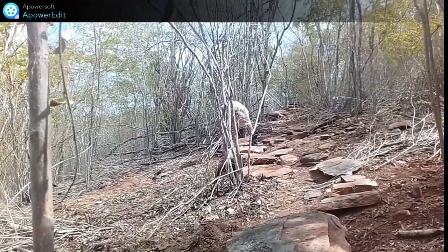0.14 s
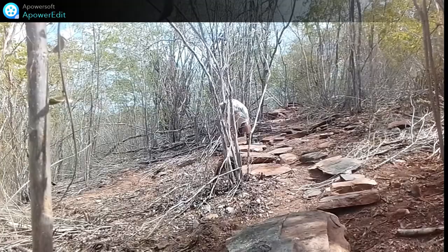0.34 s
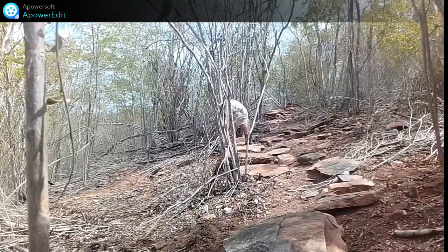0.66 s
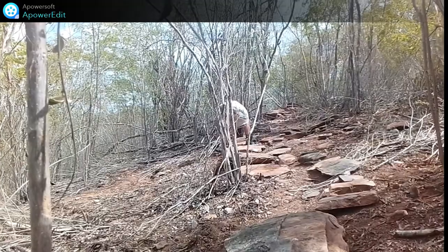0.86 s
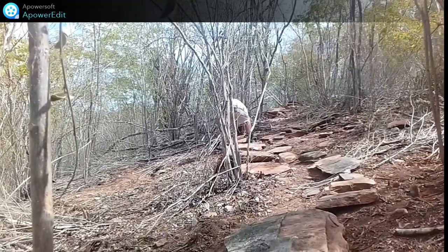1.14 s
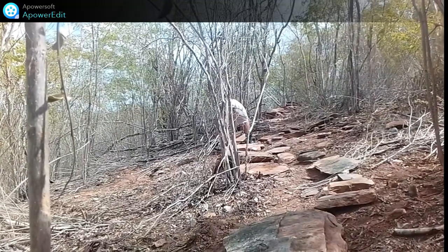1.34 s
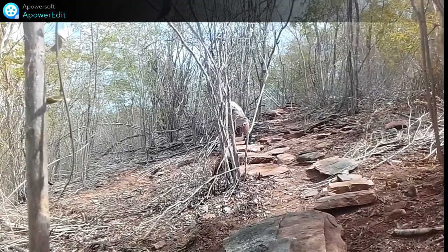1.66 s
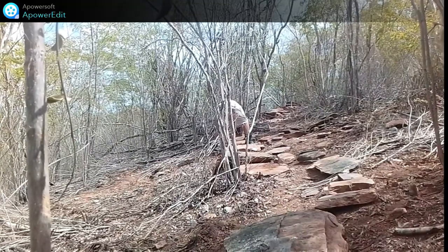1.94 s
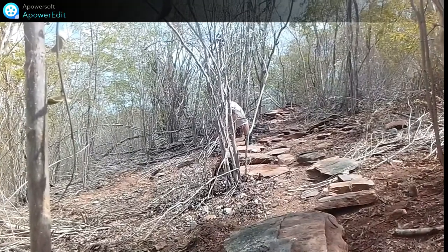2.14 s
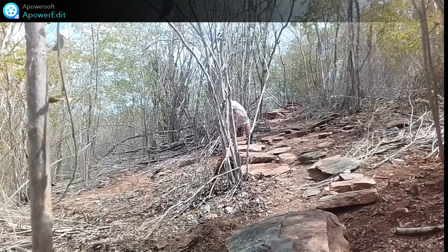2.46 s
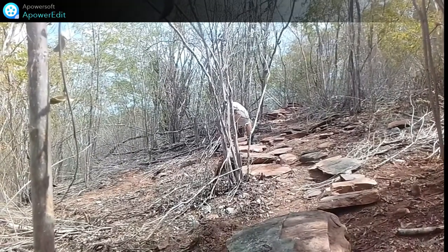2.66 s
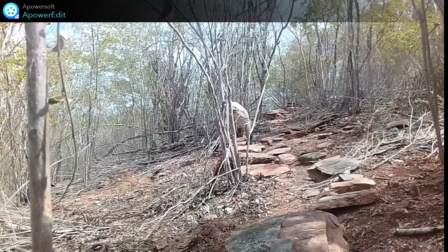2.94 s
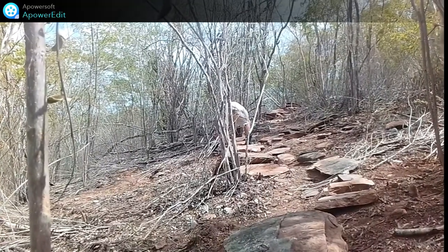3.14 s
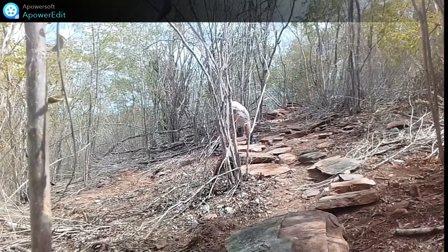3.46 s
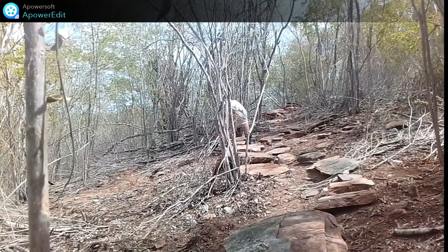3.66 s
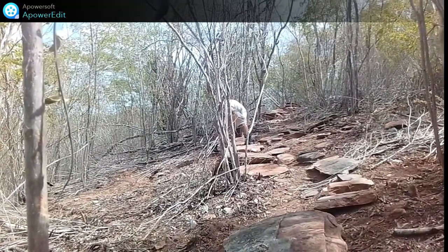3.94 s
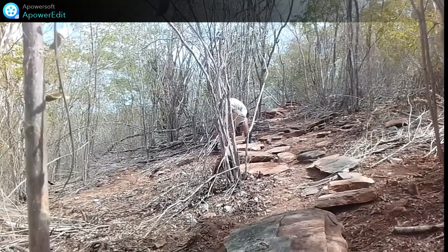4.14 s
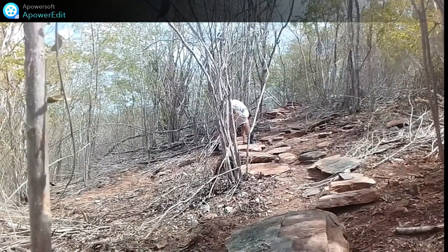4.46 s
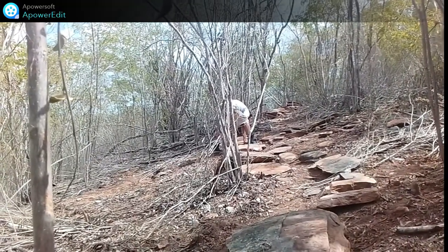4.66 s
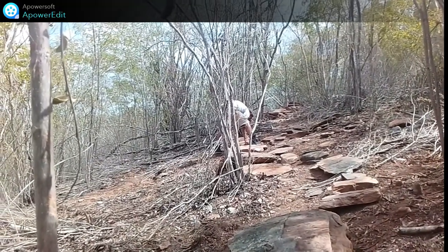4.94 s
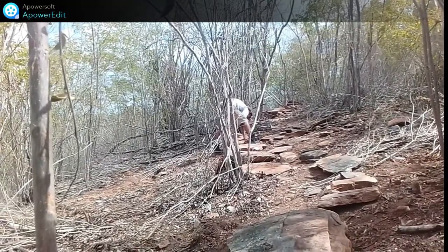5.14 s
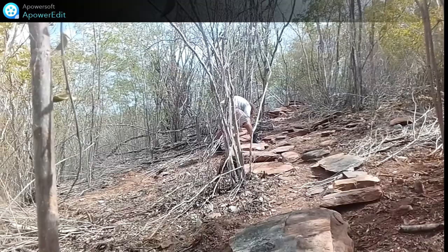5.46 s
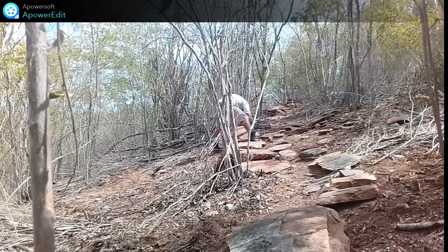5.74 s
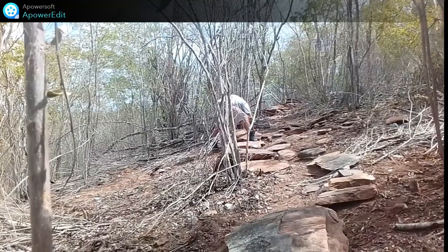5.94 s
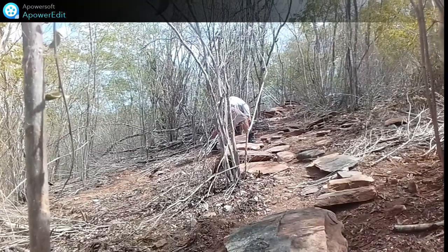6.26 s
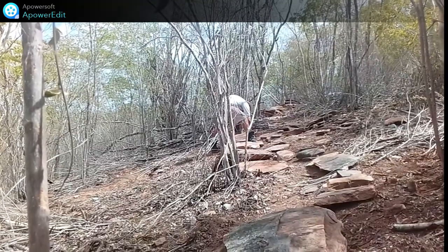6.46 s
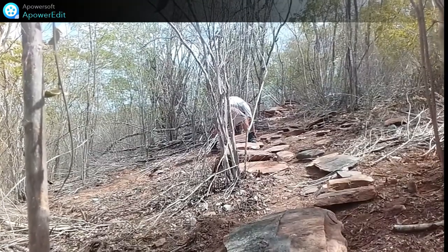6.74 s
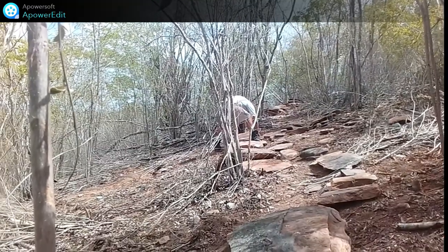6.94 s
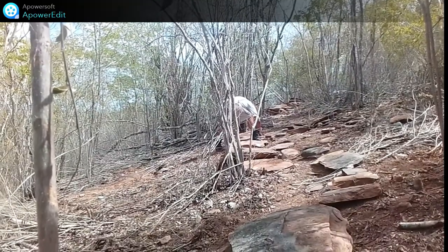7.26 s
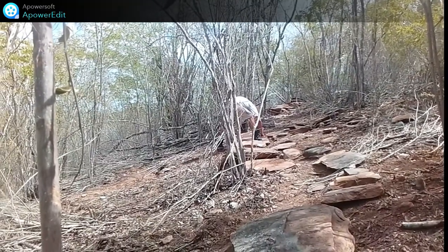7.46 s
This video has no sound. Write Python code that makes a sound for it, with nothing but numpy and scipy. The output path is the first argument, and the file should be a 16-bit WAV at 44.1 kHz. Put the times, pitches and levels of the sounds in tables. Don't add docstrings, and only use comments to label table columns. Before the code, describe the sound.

Some metres away on a dry wooded slope, stones are stacked by hand. Soft grit scrapes come first, then a very loud slab clack, two lighter clacks, a duller knock, brief brush crackles, a heavy tumbling double knock, and a final low grinding scrape. Trees return a short scattered echo. Light wind bumps the microphone over a constant faint hiss.

```python
import sys
import numpy as np
from scipy import signal
from scipy.fft import rfft, irfft, next_fast_len
from scipy.io import wavfile

SR = 44100
rng = np.random.default_rng(int(sys.argv[2]) if len(sys.argv) > 2 else 0)


def boost(x):
    u = np.asarray(x, float) / 20
    return 10 ** u


def master(y):
    cut = np.clip(np.atleast_2d(y).T, -1, 1)
    pcm = np.round(cut * 32767)
    wavfile.write(sys.argv[1], SR, pcm.astype(np.int16))


N = 335601


def rms_one(x):
    return x / np.sqrt(np.mean(x ** 2) + 1e-20)


def add(out, s, sound):
    i = int(s * SR)
    out[..., i:i + sound.shape[-1]] += sound[..., :N - i]


def filtered(x, order, edge_hz, kind):
    return signal.sosfilt(signal.butter(order, edge_hz, kind, fs=SR, output="sos"), x)


def shaped(spectrum):
    hz, level_db = np.transpose(spectrum)
    size = next_fast_len(N)
    f = np.maximum(np.fft.rfftfreq(size, 1 / SR), 1)
    gain = boost(np.interp(np.log(f), np.log(hz), level_db))
    return rms_one(irfft(rfft(rng.standard_normal(size)) * gain, size)[:N])


def swells(s, rise_s, fall_s, level_db):
    power, t = np.zeros(N), np.arange(-SR // 2, SR // 2) / SR
    for peak_s, rise, fall, peak_db in zip(s, rise_s, fall_s, level_db):
        shape = boost(2 * (peak_db - 20.5 * np.maximum(-t / rise, t / fall)))
        early = max(0, -int((peak_s + t[0]) * SR))
        add(power, max(0, peak_s + t[0]), shape[early:])
    return np.sqrt(power)


def grains(per_s, spread_db):
    excess = np.minimum(rng.exponential(1, N), 4)
    sizes = boost(spread_db * excess) * rng.choice([-1, 1], N)
    return sizes * (rng.random(N) < per_s / SR) + 1e-18


def ring(clicks, hz, t60):
    r, w = boost(-60 / (t60 * SR)), 2 * np.pi * hz / SR
    return signal.lfilter([0, np.sin(w)], [1, -2 * r * np.cos(w), r * r], clicks)


def burst(t, level_db, low_hz, high_hz, t60, rise_s):
    sources = [rng.standard_normal(len(t)), t == 0]
    noise, click = map(rms_one, filtered(sources, 2, [low_hz, high_hz], "band"))
    shape = boost(level_db - 60 * t / t60) * (1 - np.exp(-t / rise_s))
    return np.array([shape * noise, click * np.sqrt(np.mean(shape ** 2))])


def brief(t, t60):
    damping = 1.5
    return boost(-60 * damping * t / t60) * np.sqrt(1 + damping)


# hz [Hz], level_db [dB per Hz]
HISS_SPECTRUM = [(15, -61.5), (43, -23.5), (76, -3.5), (242, 1.5), (607, -4.5), (2300, -12), (14800, -18.5),
                 (16000, -22.5)]


def hiss():
    return boost(-57) * shaped(HISS_SPECTRUM)


# middle_s [s], peak_db [dB], pitch_hz [Hz]
WIND_PUFFS = [(1.62, -33, 64.85), (6.30, -35, 64.8), (3.675, -56, 69.4), (3.798, -44, 80), (3.925, -53, 70),
              (3.989, -50.5, 80), (4.125, -48.5, 68.2), (4.428, -45.5, 84.3), (4.455, -56, 69.8),
              (4.55, -57, 88.8), (4.575, -44, 90.5), (4.671, -47, 110), (4.696, -46.5, 125),
              (4.717, -46, 135.5), (4.744, -43, 80), (4.768, -45, 130), (4.788, -49, 75), (4.824, -54, 170),
              (4.833, -46, 75), (5.203, -42.5, 96), (5.214, -49, 96.3), (5.348, -36.5, 95.3),
              (5.37, -37.5, 141), (5.381, -45, 110), (6.43, -49, 70), (6.901, -59.5, 69.8), (7.53, -43, 75),
              (7.575, -60, 65)]
# start_s [s], spacing_s [s], peak_db [dB], pitch_hz [Hz]
WIND_FLUTTERS = [
    (3.371, 0.057, -58, 68),
]
# time_s [s], level_db [dB]
RUMBLE_LEVEL = [(0.0, -78), (1.35, -65), (1.7, -44.5), (1.99, -74), (3.77, -83), (5.93, -74), (6.27, -49),
                (6.61, -78), (7.61, -57)]


def wind():
    t = np.arange(-SR // 20, SR // 20) / SR
    flutter = [(s + k * spacing_s, peak_db, hz)
               for s, spacing_s, peak_db, hz in WIND_FLUTTERS for k in range(6)]
    puffs = np.zeros(N)
    for s, peak_db, hz in WIND_PUFFS + flutter:
        bell = boost(peak_db) * np.exp(-(t * hz / 0.36) ** 2)
        add(puffs, s + t[0], -bell * np.sin(2 * np.pi * hz * t + 0.7))
    rumble = rms_one(filtered(rng.standard_normal(N), 2, [35, 110], "band"))
    time_s, level_db = np.transpose(RUMBLE_LEVEL)
    rumble_db = np.interp(np.arange(N) / SR, time_s, level_db, -120, -120)
    return filtered(puffs, 3, 41, "high") + boost(rumble_db - 10.5) * rumble


# peak_s [s], rise_s [s], fall_s [s], level_db [dB]
WHISTLES = [
    (7.02, .02, 0.035, -62),
    (7.09, .07, 0.066, -65),
]


def bird():
    tone = np.sin(2 * np.pi * 1975 * np.arange(N) / SR)
    return np.sqrt(2) * swells(*np.transpose(WHISTLES)) * tone


# hz [Hz], level_db [dB per Hz]
BRUSH_SPECTRUM = [(710, -36), (1200, -5), (2680, -5), (3210, -11), (5380, 1), (7390, -8), (9800, -6.5),
                  (15000, -16.5)]
# peak_s [s], rise_s [s], fall_s [s], level_db [dB]
RUSTLES = [
    (0.712, .03, 0.058, -60.5),
    (4.826, .012, 0.034, -54),
    (5.161, 0.0032, .025, -49.5),
    (5.245, 0.058, 0.055, -58),
    (5.37, .02, 0.0102, -55),
    (5.407, 0.042, 0.024, -52),
    (5.432, 0.0094, .03, -58),
]


def brush():
    clumps = signal.lfilter([1], [1, -.985], np.abs(grains(550, spread_db=1.5)))
    return swells(*np.transpose(RUSTLES)) * rms_one(shaped(BRUSH_SPECTRUM) * (clumps + .3))


# pitch_hz [Hz], level_db [dB], t60_s [s]
BODY_MODES = [(422.7, -5, 0.031), (570, -4.5, 0.042), (676.5, 0.5, 0.025), (832, -0.5, 0.013),
              (990, -1, 0.038), (1100, -0.5, 0.027), (1284, -19, 0.018), (1540, -9, 0.038),
              (1860, -4.5, 0.01)]
LOW_EDGE_MODES = [(2720, 1.1, 0.0053), (3000, -1, 0.012), (3384, -0.89, 0.044)]
HIGH_EDGE_MODES = [(3930, 0, 0.018), (4200, -5, 0.009), (4894, -6, 0.011)]
FIZZ_MODES = [(5520, 0.5, 0.01), (6100, 0, .015), (6660, 6, 0.006), (7600, -1.5, 0.0045), (9500, 5, 0.0073)]
# peak_s [s], rise_s [s], fall_s [s], body_db [dB], brightness_db [dB]
GRIT_STROKES = [(0.216, .03, .04, -73.5, 7.5), (0.232, 0.02, 0.029, -57, -10),
                (0.378, 0.08, 0.016, -53, -9), (0.401, 0.035, 0.055, -44, -11),
                (0.485, 0.033, 0.11, -60, -10), (1.41, 0.0044, 0.029, -59, -1),
                (1.52, 0.088, 0.084, -52.5, -10.5), (1.585, 0.028, .01, -56, -16),
                (2.0, .005, 0.027, -56, -6), (2.038, 0.0098, 0.042, -54.5, -13),
                (6.083, 0.088, 0.071, -54, -12.5), (6.18, 0.28, .03, -56.5, -12),
                (6.215, 0.038, 0.029, -49, -17), (7.26, 0.05, 0.043, -42.5, -23),
                (7.308, 0.022, 0.032, -47, -18), (7.33, 0.024, 0.032, -44, -19),
                (7.354, 0.013, 0.069, -41, -26), (7.41, 0.065, 0.06, -43.5, -19),
                (7.498, 0.28, 0.05, -45.5, -19), (7.55, .08, .12, -59.5, -14)]


def scrape():
    s, rise_s, fall_s, body_db, bright_db = np.transpose(GRIT_STROKES)
    body = swells(s, rise_s, fall_s, body_db)
    bright = swells(s, rise_s, fall_s, body_db + bright_db)
    families = [(body, BODY_MODES, 417.7), (bright * boost(-1), LOW_EDGE_MODES, 795),
                (bright * boost(-1.5), HIGH_EDGE_MODES, 825), (bright * boost(0.5), FIZZ_MODES, 1300)]
    out = np.zeros(N)
    for gain, modes, per_s in families:
        clicks = grains(per_s * len(modes), spread_db=3.5)
        dealt = rng.integers(0, len(modes), N)
        rings = np.zeros(N)
        for k, (hz, level_db, t60) in enumerate(modes):
            rings += boost(level_db) * ring(clicks * (dealt == k) + 1e-18, hz, t60)
        out += gain * rms_one(rings)
    return filtered(out, 2, 220, "high")


# start_s [s], level_db [dB], centre_hz [Hz], width [octaves]
PEBBLE_TICKS = [(1.3852, -44, 5770, 0.55), (1.395, -49, 6200, 0.63), (1.404, -44, 4000, 1.4),
                (1.508, -48.5, 3180, 0.35), (1.522, -46, 3480, 0.34), (1.608, -21.5, 4400, 0.33),
                (1.621, -29, 9030, 0.088), (1.855, -51, 7500, 1), (3.725, -47, 4000, .9),
                (3.738, -57, 3200, 0.49), (3.781, -55, 4424, 0.48), (5.159, -42.5, 6000, 2.2),
                (5.385, -45, 5000, 1.8), (5.394, -42, 4000, 3), (5.407, -47.5, 5470, 0.83),
                (6.195, -45, 4590, 1.05), (6.234, -28.5, 3050, 0.39), (6.272, -36.5, 6100, 0.19),
                (6.284, -32, 9200, 0.11), (6.567, -46, 947, 0.69), (7.4296, -47, 2200, 2.1),
                (7.475, -53, 4540, .12), (7.495, -56, 4500, .12), (1.525, -40, 1540, 0.11),
                (1.407, -47.5, 1540, 0.17), (1.476, -50.5, 930, 0.22), (1.44, -48, 930, 0.11),
                (0.442, -47, 480, 0.6)]
# start_s [s], level_db [dB], centre_hz [Hz], width [octaves], t60_s [s]
GRINDING_RESTS = [
    (1.388, -50, 930, 0.14, 0.26),
    (1.738, -37, 599, 0.37, 0.11),
    (3.801, -51, 1077, 0.74, 0.5),
    (6.229, -29, 400, 0.59, 0.061),
    (7.388, -56.5, 2810, 0.13, 0.47),
    (7.445, -46, 242, 0.57, 0.34),
    (7.435, -42.5, 994, 0.17, 0.27),
]


def ticks():
    contacts = []
    for s, level_db, hz, octaves in PEBBLE_TICKS:
        t60 = 0.024 * (hz / 4e3) ** -0.64
        contacts.append((s, level_db, hz, octaves, t60, 0.00047))
    contacts += [(*row, .002) for row in GRINDING_RESTS]
    out, t = np.zeros((2, N)), np.arange(SR // 5) / SR
    for s, level_db, hz, octaves, t60, rise_s in contacts:
        half = 2 ** (octaves / 2)
        add(out, s, burst(t, level_db, hz / half, hz * half, t60, rise_s))
    return out * [[1], [boost(-5.5)]]


def single_modes(rows, scatter_db):
    out, t = np.zeros((2, N)), np.arange(SR // 5) / SR
    for s, level_db, hz, t60 in rows:
        shape = (1 - np.exp(-t * hz / 0.43)) ** 2 * boost(level_db - 60 * t / t60)
        ping = shape * np.sin(2 * np.pi * hz * t)
        add(out, s, np.array([ping, ping * brief(t, t60)]))
    return out * [[1], [boost(scatter_db)]]


# start_s [s], level_db [dB], pitch_hz [Hz],
# t60_s [s]
SMALL_PINGS = [(1.2435, -40, 1410, 0.011), (1.365, -56, 6700, .03), (1.3855, -33.5, 3460, 0.018),
               (1.386, -32.5, 4400, .018), (1.386, -40, 4850, .02), (1.385, -49, 6200, .03),
               (1.386, -57, 6750, .03), (1.403, -38, 3000, 0.016), (1.853, -39, 6200, .03),
               (1.853, -41, 9200, 0.028), (1.882, -50, 6000, .06), (1.986, -59.5, 6000, 0.16),
               (3.725, -50.5, 3410, .025), (3.725, -47, 2930, .025), (3.737, -48, 1076, 0.065),
               (3.738, -50, 3500, .03), (3.745, -52, 3080, .02), (3.780, -45, 3050, 0.016),
               (5.159, -43, 5300, .015), (5.158, -44, 8250, 0.0091), (5.385, -44, 5900, 0.017),
               (5.394, -47, 5670, .015), (5.394, -52, 10160, 0.014), (5.406, -46.5, 9700, .02),
               (6.454, -56.5, 9500, 0.023), (6.454, -55, 6500, 0.022), (6.568, -55, 3300, .02),
               (6.568, -53, 6200, .02), (6.694, -50, 4100, 0.019), (6.694, -58, 5700, .02),
               (7.245, -35, 845, 0.027), (7.253, -31.5, 977, 0.039), (7.259, -35, 583, 0.075),
               (7.262, -52, 1620, .05), (7.305, -35.5, 825, .03), (7.322, -56, 3050, .04),
               (7.35, -57, 3100, .03), (7.392, -49, 2850, .03), (7.414, -46, 2880, .03),
               (7.452, -56, 4450, .05), (7.466, -55, 4500, .05), (7.469, -45, 1630, 0.077),
               (7.49, -58, 4680, .05), (7.505, -59, 4680, .04),
               (0.212, -56, 3000, .05), (0.212, -52, 3870, 0.056), (0.357, -51, 9400, .02),
                (0.386, -49, 9600, 0.027), (0.386, -49.5, 5200, .05), (0.386, -48, 3430, .04),
                (0.396, -39, 1090, 0.035), (0.395, -43.5, 3940, 0.035), (0.42, -54, 3420, .02),
                (0.42, -41, 1070, .03), (0.506, -47, 1120, .03), (1.861, -54, 6100, 0.062),
                (1.997, -53, 5900, .05), (1.967, -51, 3000, .015), (1.985, -44.5, 9600, .015),
                (7.33, -43, 580, 0.079), (7.355, -37, 580, 0.084), (7.405, -35, 570, .05),
                (7.447, -44, 570, .04), (7.36, -52, 1900, .06), (7.40, -52, 1860, .05),
                (7.464, -45, 1880, .03), (7.487, -52, 2880, .03), (7.495, -49, 2300, .03),
                (7.52, -55, 2390, .04), (7.54, -53, 1530, .04), (7.562, -51, 1110, .04),
                (7.565, -59, 3220, .03), (7.575, -56, 1880, .07), (7.595, -52, 450, .04),
                (5.385, -46.5, 9500, 0.011)]


def small_pings():
    return single_modes(SMALL_PINGS, scatter_db=-9)


# start_s [s], level_db [dB], pitch_hz [Hz], t60_s
# [s]
BLOW_RINGS = [(1.606, 5.5, 234, 0.032), (1.607, -14, 2750, .012), (1.607, -0.5, 350, 0.031),
              (1.607, -25, 1670, 0.018), (1.609, -21, 4450, 0.022), (1.622, -14, 350, 0.026),
              (1.634, -15, 350, 0.026), (1.646, -22, 298, .04), (1.654, -23.5, 226.7, 0.027),
              (3.779, -10, 340, 0.024), (3.782, -17.5, 1040, 0.022), (3.782, -29.5, 1380, 0.029),
              (3.783, -19, 530, 0.04), (3.802, -30, 520, 0.12), (6.229, -6.5, 376, 0.034),
              (6.232, -17, 1000, 0.016), (6.2285, -2, 180, 0.038), (6.2815, -25, 3200, .012),
              (6.283, -36, 6100, 0.025), (6.229, -36, 4400, .015), (6.229, -31, 2500, .015),
              (6.2822, -5.5, 1087, 0.019), (6.2822, -11.5, 1510, 0.022), (6.283, -3, 502, 0.042),
              (6.285, -29.5, 4410, 0.018), (6.282, -10, 178, 0.034), (6.287, -8, 650, 0.046),
              (6.294, -21, 710, 0.032), (6.3115, -5, 200, 0.042), (6.376, -27, 190, 0.036),
              (6.35, -29.5, 365, 0.059), (1.645, -18.5, 180, 0.054), (1.744, -30, 150, .06),
              (1.741, -31, 600, 0.044), (7.429, -30, 250, 0.037), (7.50, -38, 235, .03),
              (6.001, -39, 380, .03), (3.896, -39, 250, 0.023), (3.963, -34, 350, 0.046),
              (0.4445, -30, 190, .028), (1.6055, -38, 12300, .01), (1.6055, -40, 15000, .008),
              (1.612, -17, 620, .03), (2.3, -40, 300, 0.033), (6.335, -16, 220, 0.03)]


def blow_rings():
    return single_modes(BLOW_RINGS, scatter_db=-8)


def stone(modes, hits, thud_hz, crunch_db, crack_db, scatter_db, rise_cycles=0.489):
    out, t = np.zeros((2, N)), np.arange(SR // 8) / SR
    hz, level_db, t60 = np.transpose(modes)[:, :, None]
    shape = (1 - np.exp(-t * hz / rise_cycles)) ** 2 * boost(level_db - 60 * t / t60)
    tree_share = np.where(hz > 1600, .1, .22)
    for s, blow_db, thud_db, ring_db, snap_db in hits:
        luck = rng.standard_normal((2, len(hz), 1))
        gain_db = blow_db + thud_db * (hz < thud_hz) + ring_db * (hz > 2000) + 3.5 * luck[0]
        held_hz = hz * (1 + .02 * (np.abs(luck[1]) - .8))
        rings = np.sign(luck[1]) * boost(gain_db) * shape * np.sin(2 * np.pi * held_hz * t)
        echoed = tree_share * rings * brief(t, t60)
        crunch = burst(t, blow_db + crunch_db, 355.7, 1574, 0.028, 0.0015)
        crack = burst(t, blow_db + snap_db + crack_db, 3500, 7170, 0.019, 0.000574)
        add(out, s, np.array([rings.sum(0), echoed.sum(0)]) + crunch + crack)
    return out * [[1], [boost(scatter_db)]]


# pitch_hz [Hz], level_db [dB], t60_s [s]
ROUND_MODES = [(156, -6, 0.03), (207, -8, 0.05), (340, 1.5, 0.03), (530, -13.5, 0.085), (667, -5, 0.047),
               (945, -2, 0.031), (1053, -6, 0.03), (1394, -5, 0.02), (1840, -37, 0.017), (3050, -27, 0.01)]
# start_s [s], strength_db [dB], low_thud_db [dB], ring_over_2_khz_db [dB], crack_db [dB]
ROUND_CONTACTS = [(0.443, -52, 8, 0, 0), (0.701, -55, 11, 0, 0), (2.638, -63, 20.5, 0, 0.5),
                  (3.57, -66, 17.5, 6, 4), (3.739, -47, -8, -1.5, 0), (3.778, -27, 0, -7, -6),
                  (3.782, -22.5, -8, -12, -2), (3.791, -29, 3, -8, -6), (3.897, -60, 14, 2.5, 2),
                  (3.966, -56, 21.5, -3, -5), (4.087, -58.5, 25, -2, -0.5), (4.169, -64, 20.5, 0.5, -0.5),
                  (4.241, -65, 20, -2, -2), (6.859, -66.5, 24, -6, 0), (7.256, -59, -11, 0, 0.5),
                  (7.430, -43, 5, 14, 17), (7.457, -56, 12, 0, 0), (7.478, -52.5, 16, 0, -5),
                  (7.504, -57, 21, 6, -2)]


def round_stone():
    return stone(ROUND_MODES, ROUND_CONTACTS, thud_hz=580, crunch_db=-28, crack_db=-38, scatter_db=14)


# pitch_hz [Hz], level_db [dB], t60_s [s]
PLATE_MODES = [(620, -2.5, 0.037), (900, -0.5, 0.034), (1141, 1, 0.03), (1460, -3.5, 0.029),
               (1805, -8, 0.022), (3820, -14, .01), (4360, -13.5, 0.013), (6100, -12, 0.029),
               (9100, -8, 0.033)]
# start_s [s], strength_db [dB], low_thud_db [dB], ring_over_2_khz_db [dB], crack_db [dB]
PLATE_CONTACTS = [
    (1.387, -48, 0, -1, 6.5),
    (1.404, -46, 0, -6, -3.5),
    (1.854, -54, 0, 11, 12.5),
    (1.880, -28.5, 0, -0.5, 6.5),
    (1.968, -45, 0, -8, -9),
    (1.984, -28.5, 0, -2, 7),
    (2.038, -47, 0, -8, -4),
]


def thin_plate():
    return stone(PLATE_MODES, PLATE_CONTACTS, thud_hz=450, crunch_db=-4, crack_db=-27, scatter_db=5.5)


# pitch_hz [Hz], level_db [dB], t60_s [s]
CAP_MODES = [(148, -8, 0.062), (184.5, 10, 0.036), (347, 6, 0.029), (490, -4, 0.044), (645, -9, 0.055),
             (930, -6.5, 0.061), (1170, -6.5, 0.027), (1417, -17, 0.048), (1540, -22, 0.024),
             (3100, -26, 0.019), (3600, -20.5, 0.014), (4450, -31, 0.034), (6100, -31, 0.018),
             (9200, -41, 0.021)]
# start_s [s], strength_db [dB], low_thud_db [dB], ring_over_2_khz_db [dB], crack_db [dB]
CAP_CONTACTS = [(6.001, -43.5, -0.5, -3.5, -5.5), (6.019, -49, 4.5, 6, 5), (6.2278, -21.5, -11, -8, 2),
                (6.2305, -15, -18, 4, -8), (6.233, -24, -12, -3, 5), (6.257, -27.5, -7, -8, 3),
                (6.268, -21, -19, -6, 0), (6.2800, -18.5, 6, 3, -7), (6.2820, -13, -4, 9, -2),
                (6.2874, -17, -12, 7, -1), (6.295, -19.5, -15, 4, -15), (6.312, -27, -1, 5.5, 13),
                (6.336, -32.5, 0.5, 2, -9), (6.376, -64, 9.5, -5.5, -11), (6.562, -55.5, 1.5, -1.5, -6.5)]


def cap_stone():
    return stone(CAP_MODES, CAP_CONTACTS, thud_hz=450, crunch_db=-5.5, crack_db=-29.5, scatter_db=3.5,
                 rise_cycles=0.29)


# pitch_hz [Hz], level_db [dB], t60_s [s]
SLAB_MODES = [(212.5, -5, 0.053), (242, 1, 0.04), (350, -2.5, 0.028), (514, -21, 0.072),
              (604, -8.5, 0.0301), (930, -13, 0.03), (1045, -11.5, 0.028), (1310, -1, 0.018),
              (1540, -18, 0.045), (1790, -15.5, 0.031), (2750, -12.5, 0.012), (4400, -2.5, 0.0027),
              (6000, -19, 0.028), (9260, -27.5, 0.0189)]
# start_s [s], strength_db [dB], low_thud_db [dB], ring_over_2_khz_db [dB], crack_db [dB]
SLAB_CONTACTS = [(1.244, -47, -25, -5, 6), (1.487, -46.5, 16.5, -7, -2.5), (1.508, -49.5, 15.5, -3, -9),
                 (1.522, -40.5, -1, -5, -3), (1.592, -37.5, -23, -5, 6.5), (1.605, -2.5, -12, -11, -22.5),
                 (1.6077, -9, 3, -7, 6.5), (1.6119, -21, -13, 3.5, 7.5), (1.6222, -33, -0.5, 2, 22),
                 (1.634, -27, -2, 8, 17), (1.665, -35, 6.5, -1, 7), (1.738, -42, 0, -8, 4),
                 (1.747, -38, -20, -4, 3.5), (1.754, -37.5, 4, -1, 14.5), (1.812, -47, 7, -3, 16)]


def big_slab():
    return stone(SLAB_MODES, SLAB_CONTACTS, thud_hz=450, crunch_db=-8, crack_db=-24.5, scatter_db=3.5)


# centre_hz [Hz], level_db [dB], t60_s [s]
WOODS_BANDS = [(150, -13.5, 0.35), (294.2, -12, 0.314), (630.7, -9.5, 0.304), (1200, -11, 0.46),
               (2448, -4.5, 0.36), (4540, 2.5, 0.28), (8640, -8, 0.33), (13000, 6.5, 0.2)]


def woods(x):
    t, echoes = np.arange(SR // 2) / SR, 0
    trunks = signal.lfilter([1], [1, -.99], np.abs(grains(160, spread_db=3)))[:len(t)]
    trunk_share = .25
    lumps = rms_one(1 - trunk_share + trunk_share * rms_one(trunks))
    for hz, level_db, t60 in WOODS_BANDS:
        edges_hz = [hz / np.sqrt(2), min(hz * np.sqrt(2), 19000)]
        noise = filtered(lumps * rng.standard_normal(len(t)), 2, edges_hz, "band")
        shape = (1 - np.exp(-t / 0.0062)) * boost(-60 * t / t60)
        echoes = echoes + boost(level_db) * noise * shape / np.sqrt(np.sum(shape ** 2))
    return signal.fftconvolve(x, echoes)[:N]


def scene():
    stones = big_slab() + thin_plate() + round_stone() + cap_stone()
    direct, scattered = stones + ticks() + small_pings() + blow_rings()
    knocks = filtered(direct + woods(scattered), 3, 135, "high")
    near = scrape() + brush() + wind() + bird()
    return (knocks + near + hiss())[None]


def low_pass(x):
    return signal.sosfilt(signal.butter(12, 15800, fs=SR, output="sos"), x)


def record(dry):
    top = 1.4
    mix = top * np.tanh(boost(1.0) * dry / top)
    return low_pass(mix)


dry = scene()
out = record(dry)
master(out)
```